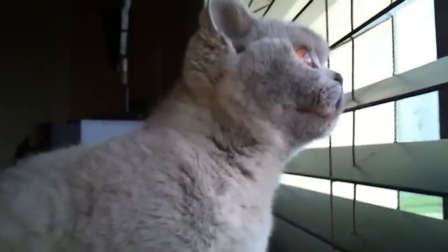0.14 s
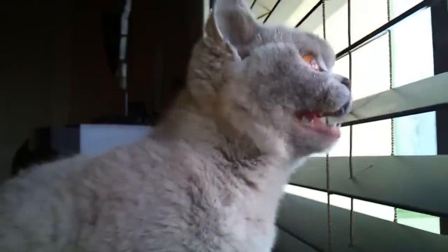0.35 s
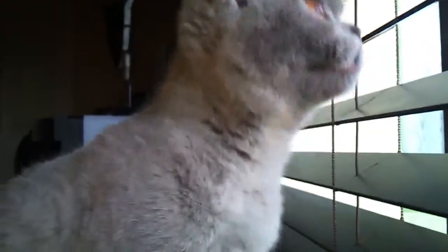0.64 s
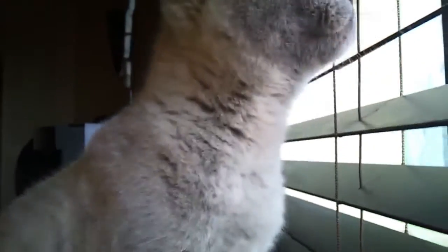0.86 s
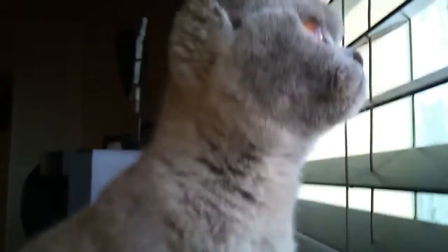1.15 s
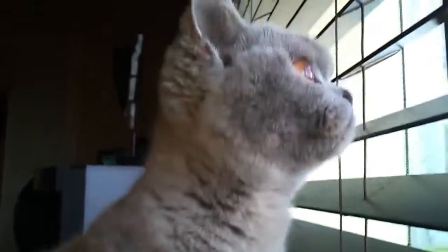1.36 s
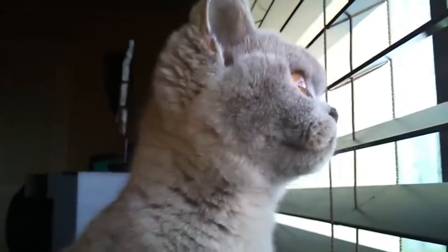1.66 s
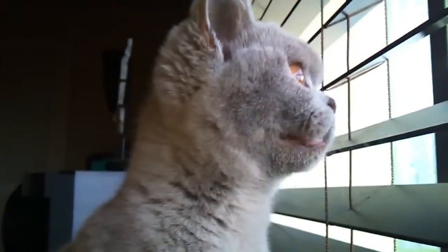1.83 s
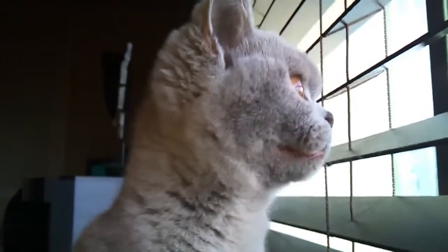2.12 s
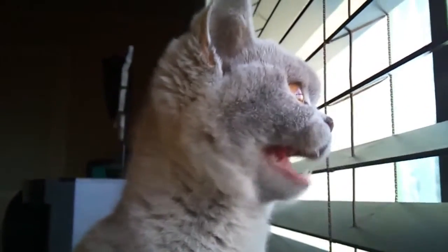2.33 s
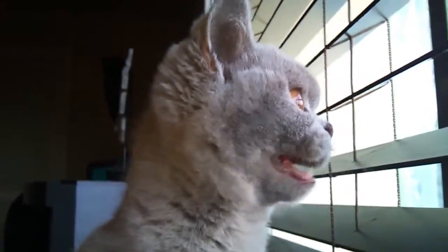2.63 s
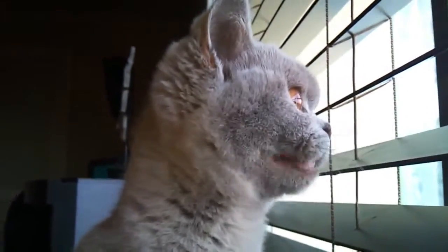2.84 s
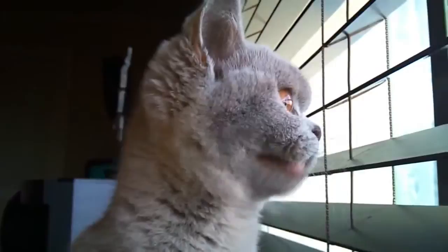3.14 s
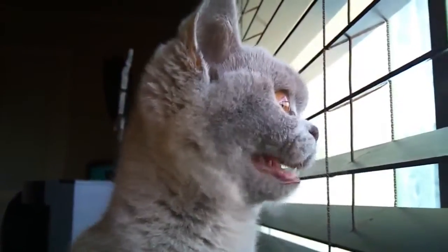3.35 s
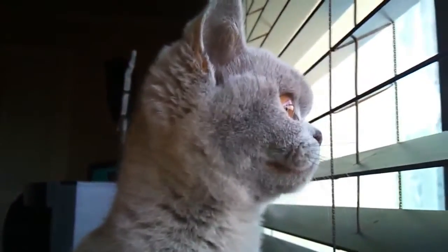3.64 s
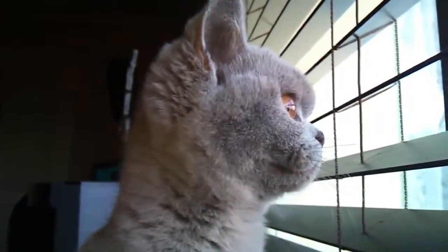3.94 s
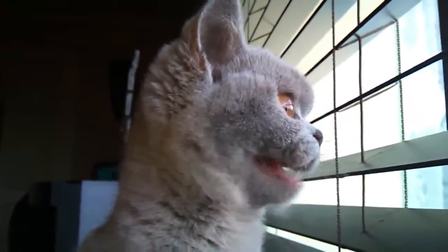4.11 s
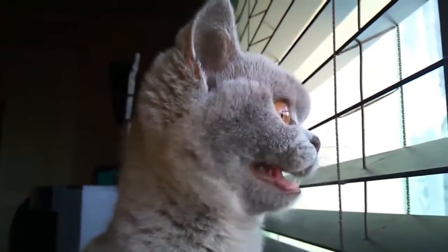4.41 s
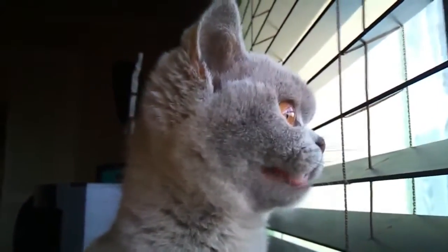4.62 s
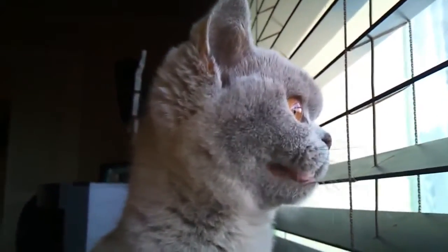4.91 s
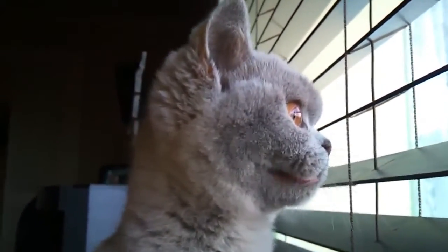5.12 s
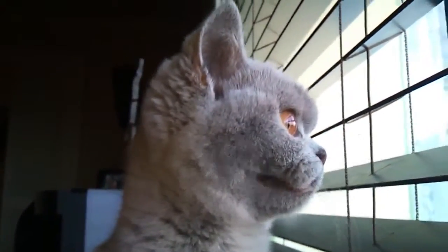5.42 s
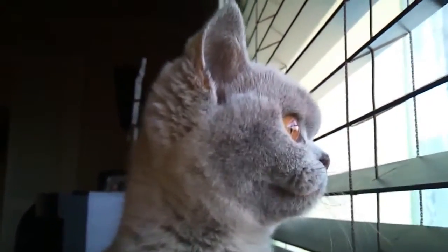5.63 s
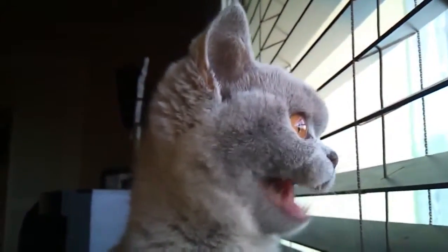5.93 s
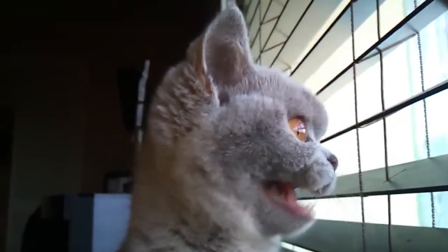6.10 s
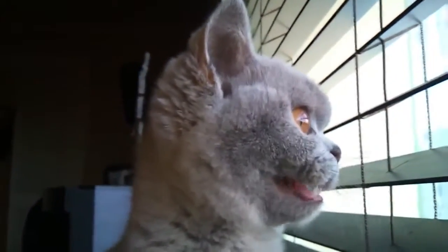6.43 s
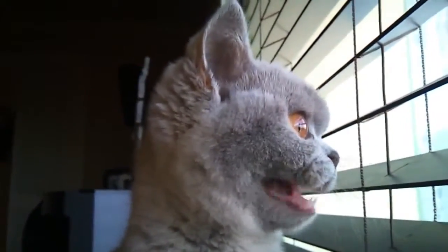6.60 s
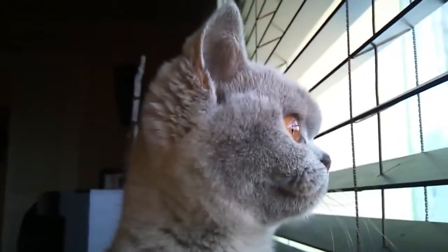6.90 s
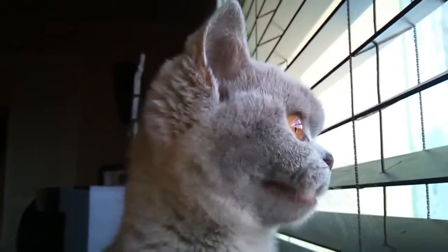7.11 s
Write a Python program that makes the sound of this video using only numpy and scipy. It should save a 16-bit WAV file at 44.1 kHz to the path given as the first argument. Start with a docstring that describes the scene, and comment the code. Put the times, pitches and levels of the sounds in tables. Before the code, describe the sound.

A cat chatters close up in short runs of wet ticks and hollow little smacks, over steady low mains hum and soft hiss in a quiet room.

```python
"""Wet ticks and smacks of a cat chattering at a window, close up, in runs of about 15 strokes a second.
A light stroke is one tick: a wet film tears at the lips and rings the mouth. A full stroke is a smack:
the lips part, then the tongue lets go with a hollow pop from the ringing air in the mouth.
Saliva fizzes after each stroke as fine crackle, and the pose of the mouth colours what leaves it.
A few soft rustles join in; the quiet room answers faintly, over mains hum and an even hiss."""
import sys
import numpy as np
from scipy import signal
from scipy.io import wavfile

SR = 44100
rng = np.random.default_rng(int(sys.argv[2]) if len(sys.argv) > 2 else 0)


def store_pcm(level_fs):
    """Save levels as 16-bit WAV."""
    pcm = np.round(np.clip(level_fs, -1, 1) * 32767).astype(np.int16)
    wavfile.write(sys.argv[1], SR, np.atleast_2d(pcm).T)


N = 320166  # length in samples
TAPS = 2048  # length of the filters and of the short sounds, in samples
CUTOFF_HZ = 10800  # top of the recorded band


# Edge of a click, the bright spit at the lips: f/Hz, level/dB
EDGE_COLOUR = [(2000, -41.5), (4300, -12), (4900, 3), (5400, -10), (5950, 0.5), (7000, -5), (7700, -7.5),
               (9000, -3.5)]


def clicks(lip_ring_db=6.5, lip_width_hz=850, knock_hz=360, knock_decay_s=0.0012, knock_db=-2, edge_trim_db=2.0):
    """A wet film tears: tiny snaps around a sharper one ring the mouth. A stronger edge tears for longer."""
    out = np.zeros(N)
    t = np.arange(TAPS) / SR
    # every release also nudges the air in the mouth into a brief low knock
    knock_shape = t * np.exp(-t / knock_decay_s)
    knock = burst(np.sin(2 * np.pi * knock_hz * t) * knock_shape, span=0.0019)
    for s, body_db, edge_db in releases():
        _, _, lip_hz, _ = pose(s)
        tear_s = .0018 + .004 * amp(edge_db)
        tear = crackle(TAPS, spread_db=.6) * np.exp(-(t / tear_s) ** 2)
        tear[int(.0004 * SR)] += 1.8  # the sharper snap
        body = burst(colour(tear, cavity(s)), span=0.0053)
        edge_colour = past_lips(EDGE_COLOUR, s)
        edge = burst(colour(tear, edge_colour, lip_hz, lip_ring_db, lip_width_hz), span=0.0046)
        click = amp(body_db) * (body - amp(knock_db) * knock)
        add(out, s, click + amp(edge_db + edge_trim_db) * edge)
    return out


# Full strokes of the jaw: t/s, click level/dB, brightness (edge over body, before the edge trim)/dB,
# lag of the tongue/s, pop level before its high-pass/dB, pop f before its glide/Hz
SMACKS = [(0.5826, -25.5, 11.5, 0.003, -25, 306), (0.5897, -23, 3.5, 0.0035, -44, 270),
          (.631, -29, 15.5, 0.0053, -18, 447), (.899, -43, -15, 0.0008, -41, 443),
          (1.8356, -38.5, -20, 0.0032, -40, 560), (2.005, -39, -4, 0.0038, -22.5, 370),
          (2.022, -39.5, -9, .003, -35, 625), (2.0707, -40.5, 14, 0.0012, -24.5, 297),
          (2.5942, -41, 12.5, .001, -31, 266), (2.6476, -35.5, 7.5, 0.0063, -31, 353),
          (2.7162, -35.5, 8, .007, -31, 260), (3.067, -38, 8.5, 0.0081, -33.5, 280),
          (3.535, -48.5, -5, 0.00079, -35, 294), (3.604, -46.5, -1.5, .001, -35.5, 270),
          (3.7291, -38, 8, 0.0066, -34, 364), (3.7901, -39.5, 6.5, .011, -32.5, 270),
          (4.457, -46.5, 8.5, .001, -38, 270), (4.653, -45.5, 12, .001, -37.5, 324),
          (4.79, -43.5, 8.5, 0.00093, -37.5, 270), (5.1289, -44.5, -11, .0036, -39.5, 463),
          (5.157, -62, -10, .001, -39.5, 450), (5.426, -54, -10, 0.00092, -38.5, 557),
          (6.027, -55, -12, 0.0011, -40.5, 550), (6.2994, -44, 7, .015, -38.5, 328),
          (6.4327, -44, 3.5, 0.0082, -34, 270), (6.498, -41, 5, 0.0093, -36.5, 364),
          (6.633, -39, -6.5, 0.0046, -25.5, 317), (6.8186, -34.5, -20, 0.0084, -30, 305),
          (6.8744, -40, -15, .008, -34, 330)]


def pops(rise_s=0.0012, cycles=0.82, glide=0.042, glide_s=0.0071, low_hz=215, sealed_db=-20):
    """The mouth's air rings briefly, rising as the jaw opens; a tighter mouth rings higher and longer."""
    out = np.zeros(N)
    t = np.arange(TAPS) / SR
    for s, _, _, lag, pop_db, hz in SMACKS:
        # the strongest pops come from a well sealed mouth, which swells and dies more slowly
        stretch = 1 + amp(pop_db - sealed_db) ** 2
        gliding_hz = hz * (1 + glide * np.tanh(t / glide_s - .5))
        turns = np.cumsum(gliding_hz) / SR
        swell = 1 - np.exp(-t / (rise_s * stretch))
        decay_turns = stretch * cycles * (hz / 350) ** 1.64
        ring = -np.sin(2 * np.pi * turns) * swell * np.exp(-turns / decay_turns)
        add(out, s + lag, amp(pop_db) * burst(ring, span=0.0085))
    # so small a mouth radiates little bass
    return signal.sosfilt(signal.butter(2, low_hz, "high", fs=SR, output="sos"), out)


# Light strokes of the jaw: t/s, click level/dB, brightness (edge over body, before the edge trim)/dB
TICKS = [(.6442, -32.5, 18), (1.8919, -41, -22), (2.0769, -35, 12.5), (2.244, -41.5, -5.5),
         (2.4924, -44.5, 4.5), (2.78, -36, 2), (2.8454, -34.5, 7.5), (2.9086, -36, 2), (3.013, -37, 4),
         (3.974, -45, 16), (4.0033, -37, -18), (4.5274, -41, -1), (4.5936, -39.5, 3.5), (4.7336, -45.5, -8),
         (4.861, -39.5, 1), (4.9695, -49, 14.5), (5.002, -37.5, -12), (5.305, -37.5, -20),
         (6.0178, -56, 16), (6.105, -41.5, -2), (6.166, -45, -0.5), (6.2344, -42, 4), (6.3654, -40, 6.5),
         (6.6978, -41, -9)]


def releases(tongue_db=-0.85, tongue_bright_db=-1.3):
    """Each stroke parts the lips; in a smack a softer, duller tongue follows: t/s, body/dB, edge/dB."""
    lips = [(s, db, db + bright) for s, db, bright, *_ in SMACKS + TICKS]
    tongue = []
    for s, db, bright, lag, _, _ in SMACKS:
        body_db = db + tongue_db
        tongue.append((s + lag, body_db, body_db + bright + tongue_bright_db))
    return lips + tongue


# Pose of the mouth: t/s, opening (0 nearly shut, 1 wide), treble let out past the lips/dB,
# lip gap resonance f/Hz, fizz level against the click's edge (both before their trims)/dB
POSE = [(.59, .05, 1.5, 4230, -24), (.635, .07, 4.5, 6640, -8.5), (1.89, 0.13, 6, 6700, -10),
        (2.07, 0.91, 7, 6940, -9.5), (2.8, 0.73, 3.5, 6150, -9), (3.07, 0.85, 1, 6200, -9),
        (3.8, 0.84, -2, 5000, -21.5), (4.8, 0.98, -7, 5650, -16), (6.02, 0.67, -6, 4730, -16),
        (6.3, 0.74, -7, 5900, -14), (6.8, 0.83, -3, 5800, -27)]


def pose(s):
    """The mouth glides between poses; gives opening, treble/dB, lip resonance/Hz and fizz/dB at time s."""
    times, *columns = np.transpose(POSE)
    return [np.interp(s, times, column) for column in columns]


# Body of a click, from the resonances of the wide mouth: f/Hz, level/dB
WIDE_MOUTH = [(250, -9.5), (520, -2.5), (900, -10.5), (1380, 1.5), (1750, -5.5), (2300, -8.5), (2700, -16),
              (3050, -1.5), (3620, 4.5), (4250, -18), (6000, -37)]
# Body of a click, from the resonances of the nearly shut mouth: f/Hz, level/dB
SHUT_MOUTH = [(300, -10.5), (820, -17), (1130, 8), (1650, -10.5), (2230, 8.5), (3400, -17.5), (4400, -7.5),
              (6000, -38)]


def cavity(s):
    """The mouth's resonances shift as it opens: a blend of nearly shut and wide at time s."""
    wide = pose(s)[0]
    points = []
    for hz, _ in sorted(WIDE_MOUTH + SHUT_MOUTH):
        points.append((hz, wide * read(WIDE_MOUTH, hz) + (1 - wide) * read(SHUT_MOUTH, hz)))
    return points


def past_lips(points, s, corner_hz=6650, spread_hz=160):
    """The lips open or shade the top treble of a spectrum at time s, as a high shelf."""
    _, treble_db, _, _ = pose(s)
    hz = np.arange(0, SR / 2, 20)
    shelf = (1 + np.tanh((hz - corner_hz) / spread_hz)) / 2
    return np.column_stack([hz, read(points, hz) + treble_db * shelf])


# Colour of the fizzing saliva: f/Hz, level/dB
FIZZ_COLOUR = [(700, -18), (1250, -9.5), (1700, -17), (4100, -11), (4850, -6), (5400, -3.5), (6100, 1.5),
               (7700, -9), (9000, -6.5)]


def saliva(delay_s=.003, hold_s=0.02, trim_db=4.5):
    """Saliva fizzes once the lips part and on past the tongue; sharp strokes and a wet mouth fizz louder."""
    strokes = [row[:4] for row in SMACKS] + [(*row, 0) for row in TICKS]
    rows = []
    for s, db, bright, lag in strokes:
        fizz_db = pose(s)[-1]
        rows.append((s + delay_s, lag + hold_s, db + bright + fizz_db + trim_db))
    return sprays(rows, FIZZ_COLOUR, fade_db=14, spread_db=4.0)


# Soft rustles: t/s, length/s, level/dB
RUSTLES = [(1.17, 0.053, -54), (2.002, 0.043, -45.5), (2.285, 0.05, -42), (2.34, 0.081, -46.5),
           (5.12, 0.024, -55)]
# Colour of the rustles: f/Hz, level/dB
RUSTLE_COLOUR = [(200, 0.5), (1300, -1), (4000, -10), (7000, -19)]


def rustles():
    """Short soft runs of crackle, darker than the fizz, with the same treble shading as the mouth."""
    return sprays(RUSTLES, RUSTLE_COLOUR, fade_db=5, spread_db=4)


def sprays(rows, spectrum, fade_db, spread_db):
    """Short runs of fine crackle that swell quickly and fade; rows are t/s, length/s, level/dB."""
    out = np.zeros(N)
    for s, length, db in rows:
        size = int(length * SR)
        fade = amp(-fade_db * np.linspace(0, 1, size))
        grains = crackle(size, spread_db) * signal.windows.tukey(size, .5) * fade
        grains = np.pad(grains, (0, TAPS))  # room for the filter to ring out
        add(out, s, amp(db) * burst(colour(grains, past_lips(spectrum, s)), length))
    return out


# Time for the room to decay by 60 dB: f/Hz, t/s
ROOM_T60 = [(300, 0.37), (1300, 0.25), (6000, 0.39)]
# Colour of the room's tail: f/Hz, level/dB
ROOM_COLOUR = [(200, 7), (470, -6), (660, 13.5), (950, 5), (1300, 8), (2500, 1.5), (4500, -4.5),
               (7000, -9.5)]


def room(x, early_db=-21, tail_db=-15):
    """First reflections off the blind and pane, with a short diffuse tail of decaying noise."""
    size = SR // 2
    hz, t, bands = signal.stft(rng.standard_normal(size), SR, nperseg=256)
    start_db = read(ROOM_COLOUR, hz)[:, None]
    fall_db = 60 * t / read(ROOM_T60, hz)[:, None]
    bands = bands * amp(start_db - fall_db) * (hz < CUTOFF_HZ)[:, None]
    swell = np.minimum(np.arange(size) / SR / 0.0044, 1)
    tail = signal.istft(bands, SR, nperseg=256)[1][:size] * swell
    response = amp(tail_db) * tail / np.linalg.norm(tail)
    for delay_s in (.0013, .0024, .0041):
        response[int(delay_s * SR)] += amp(early_db)
    return signal.fftconvolve(x, response)[:N]


# Mains hum: multiple of the mains frequency, rms level/dB
HUM = [(1, -48), (2, -56.5), (3, -43.5)]


def hum(mains_hz=50):
    """Steady sines on the mains frequency and its harmonics, strongest on the third."""
    t = np.arange(N) / SR
    out = np.zeros(N)
    for multiple, db in HUM:
        turns = multiple * mains_hz * t + rng.random()
        out += amp(db) * np.sqrt(2) * np.sin(2 * np.pi * turns)
    return out


# Colour of the hiss: f/Hz, level/dB
HISS_COLOUR = [(20, -6.5), (70, -1.5), (230, -1), (350, -4), (520, -6.5), (1000, -10), (2000, -14.5),
               (4000, -17), (10000, -20)]


def hiss(level_db=-44.0):
    """Even noise of the room and the microphone: coloured white noise at a steady level."""
    return amp(level_db) * unit(colour(rng.standard_normal(N), HISS_COLOUR))


def amp(db):
    """Decibels to gain."""
    return 10 ** (np.asarray(db) / 20)


def unit(x):
    """Scales to rms 1."""
    return x / np.sqrt(np.mean(x ** 2) + 1e-20)


def burst(x, span):
    """Scales a short sound to the energy of rms 1 held for span seconds."""
    return x * np.sqrt(span * SR / (np.sum(x ** 2) + 1e-20))


def crackle(size, spread_db):
    """Noise made of tiny snaps of unequal size; a wider spread makes them more unequal."""
    snap_db = spread_db * np.minimum(rng.exponential(1, size), 4)
    return unit(rng.standard_normal(size) * amp(snap_db))


def read(points, hz):
    """Reads a spectrum table on a log-frequency axis."""
    f, value = np.transpose(points)
    return np.interp(np.log(hz + 1), np.log(f + 1), value)


def colour(x, points, ring_hz=1000, ring_db=0, width_hz=500):
    """Filters with the given spectrum and one extra resonance, causally so nothing sounds early."""
    hz = abs(np.fft.fftfreq(TAPS, 1 / SR))
    db = read(points, hz) + ring_db / (1 + (2 * (hz - ring_hz) / width_hz) ** 2)
    # minimum phase follows from the log spectrum by the Hilbert transform
    response = np.exp(np.conj(signal.hilbert(np.log(amp(db)))))
    return signal.oaconvolve(x, np.fft.ifft(response).real)[:len(x)]


def add(mix, s, sound):
    """Adds a sound into the mix at time s."""
    part = mix[max(round(s * SR), 0):][:len(sound)]
    part += sound[:len(part)]


def scene():
    """The cat and the rustles in their room, over hum and hiss."""
    close = clicks() + pops() + saliva() + rustles()
    return (close + room(close) + hum() + hiss())[None]


# The microphone's treble, with a deep notch: f/Hz, level/dB
MICROPHONE = [(6900, 0), (7300, -3.5), (7700, -13), (8050, -24), (8450, -15), (8900, -14.5), (9450, -21),
              (10000, -34), (10600, -50)]


def record(dry):
    """The microphone's colour, the band limit and a small steady offset."""
    heard = colour(dry[0], MICROPHONE)
    low_pass = signal.firwin(511, CUTOFF_HZ, window=("kaiser", 9), fs=SR)
    offset = -.0279  # of full scale
    return offset + signal.oaconvolve(heard, low_pass, "same")[None]


dry = scene()
out = record(dry)
store_pcm(out)
```